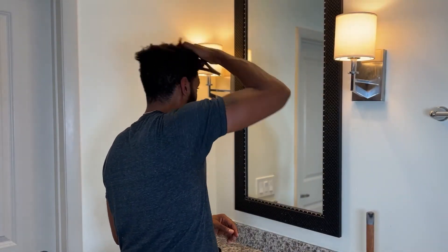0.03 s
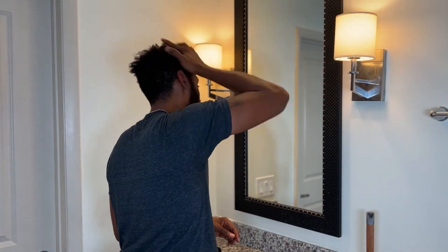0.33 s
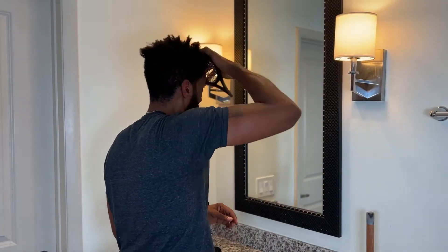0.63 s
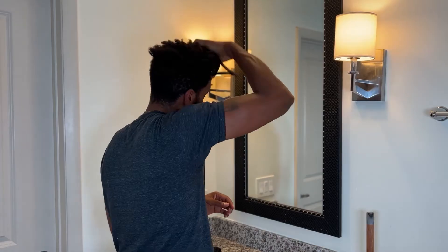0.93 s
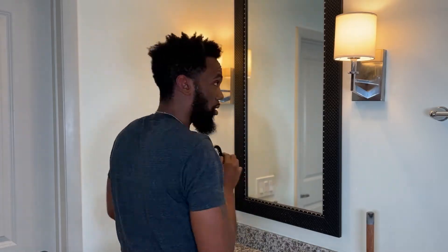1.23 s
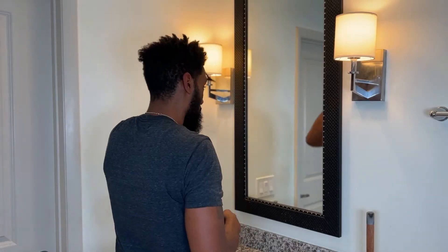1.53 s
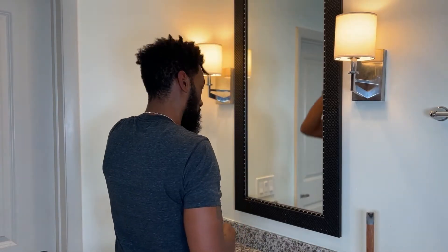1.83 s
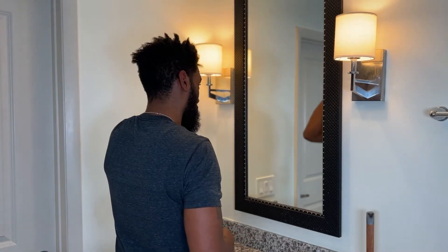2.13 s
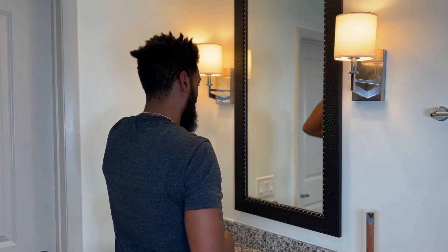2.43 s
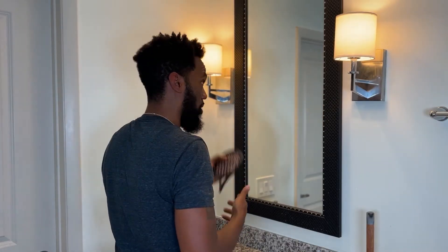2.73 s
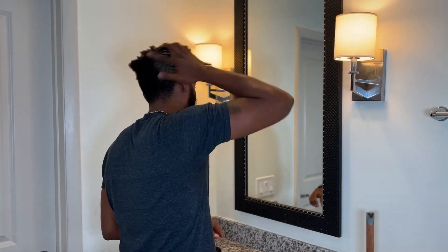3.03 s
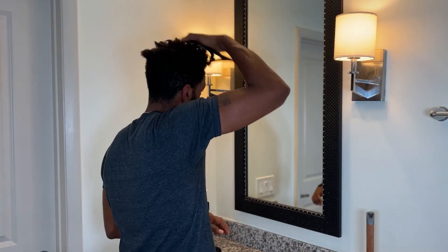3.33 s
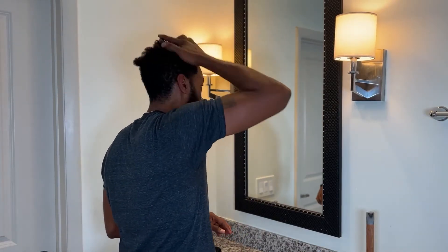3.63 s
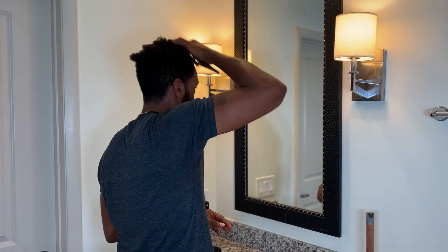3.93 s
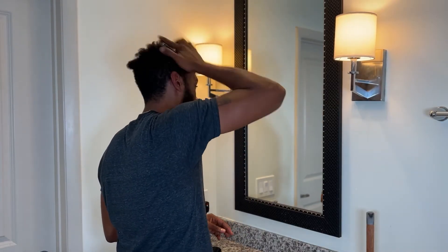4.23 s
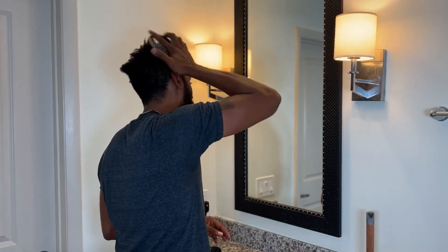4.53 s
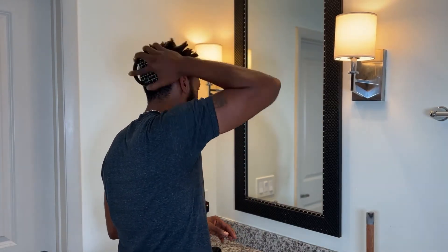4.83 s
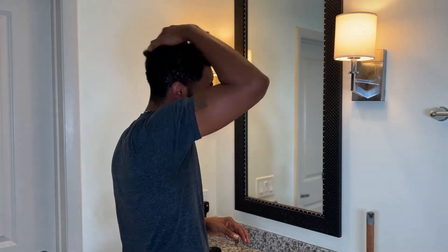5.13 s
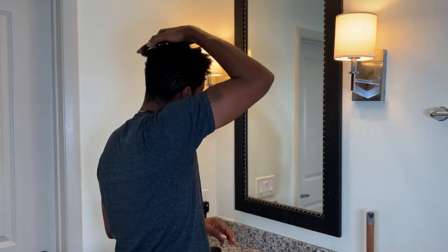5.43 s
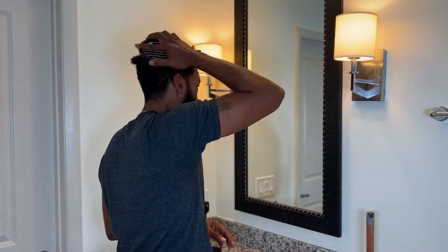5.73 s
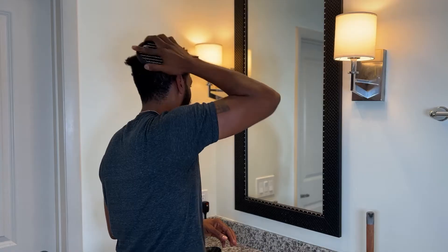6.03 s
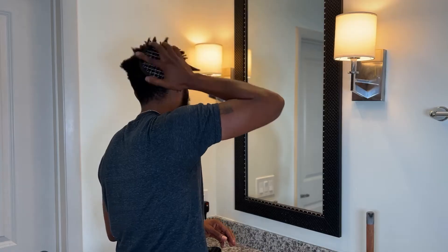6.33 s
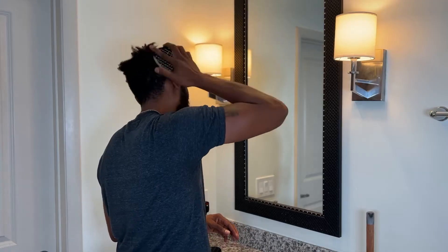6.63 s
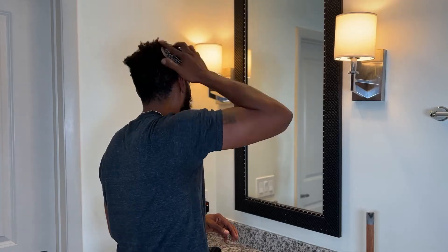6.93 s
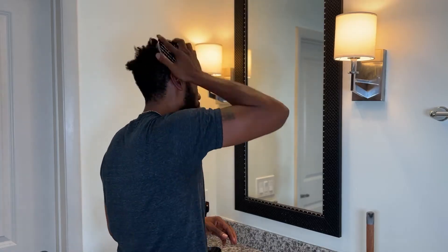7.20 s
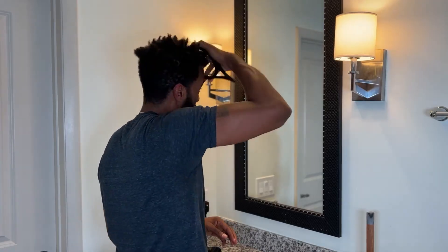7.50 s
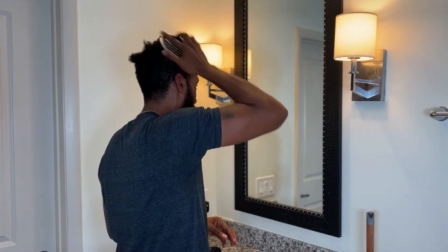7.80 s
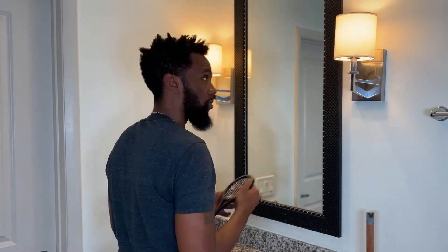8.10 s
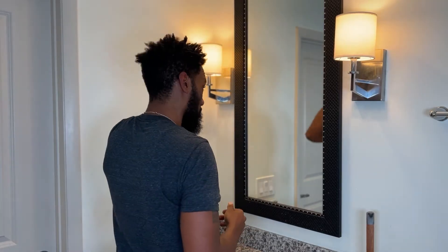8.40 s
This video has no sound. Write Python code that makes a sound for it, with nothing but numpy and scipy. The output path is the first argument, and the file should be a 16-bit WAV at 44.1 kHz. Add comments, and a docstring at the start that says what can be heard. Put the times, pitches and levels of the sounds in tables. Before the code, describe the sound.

A comb rubs quickly over short hair with a faint hiss, over low room rumble and one sharp knock.

```python
"""A quiet bathroom: a man rubs a comb over his short hair in small, very fast circles.
Hairs snap off the teeth in a hiss and the tips rasp on the scalp; both stop when the comb lifts.
While he works the back of his head his shirt scuffs in time. A close microphone picks up the low
rumble of his movements, light bumps, and one sharp knock and clack as the comb changes hands."""
import sys
import numpy as np
from scipy import signal
from scipy.fft import rfft, irfft
from scipy.io import wavfile

SR = 44100
rng = np.random.default_rng(int(sys.argv[2]) if len(sys.argv) > 2 else 0)


def store_wav(level_fs):
    """Save 16-bit WAV to argv[1]."""
    pcm = np.round(np.clip(np.atleast_2d(level_fs), -1, 1) * 32767)
    wavfile.write(sys.argv[1], SR, pcm.T.astype(np.int16))


N = 373086
TIME_S = np.arange(N) / SR

# Arm behind the head, dragging the shirt. Each row: start, end in seconds, gain in dB re body motion.
REACHES = [(1.355, 1.783, -23), (1.806, 2.45, -21.5), (2.45, 2.78, -21.5), (8.29, 8.35, -23.5)]
# Body motion, driving rumble and shirt. Each row: time in seconds, level in dB.
BODY_MOTION = [(0.1, -55), (0.35, -57), (0.75, -54), (1.2, -51.5), (1.37, -46.5), (1.48, -54.5),
               (1.63, -50), (1.9, -46), (2.2, -49), (2.76, -48), (2.87, -54), (3.16, -57), (3.3, -50.5),
               (3.75, -55.5), (4.9, -56), (7.0, -53.5), (8.14, -53), (8.3, -47.5)]


def gain_of(db):
    """Decibels to gain."""
    return 10 ** (np.asarray(db) / 20)


def unit_rms(x):
    """Scale to an rms of one."""
    return x / np.sqrt(np.mean(x ** 2) + 1e-20)


def curve(rows):
    """Linear interpolation of (seconds, value) rows."""
    return np.interp(TIME_S, *zip(*rows))


def gate(start_s, end_s, edge_s):
    """One between two times, zero outside, ramped edges."""
    return np.clip(.5 + np.minimum(TIME_S - start_s, end_s - TIME_S) / edge_s, 0, 1)


def add(mix, start_s, sound):
    """Mix a sound in, in place."""
    part = mix[max(round(start_s * SR), 0):][:len(sound)]
    part += sound[:len(part)]


def colour(x, spectrum, size=8192):
    """Minimum-phase filter, unit rms out. Each spectrum row: frequency in Hz, relative level in dB."""
    hz, db = np.transpose(spectrum)
    bins_hz = abs(np.fft.fftfreq(size, 1 / SR))
    log_gain = np.log(gain_of(np.interp(np.log(bins_hz + 1), np.log(hz), db)))
    response = np.exp(np.conj(signal.hilbert(log_gain)))
    taps = np.fft.ifft(response).real[:size // 2]
    return unit_rms(signal.oaconvolve(x, taps)[:N])


def resonate(x, hz, q):
    """One resonance, applied twice for steep skirts; unit rms out."""
    peak = signal.iirpeak(hz, q, fs=SR)
    return unit_rms(signal.lfilter(*peak, signal.lfilter(*peak, x)))


def wander(hz):
    """Smooth random drift of unit rms, rolling off above hz."""
    rolloff = np.exp(-(np.fft.rfftfreq(N, 1 / SR) / hz) ** 2)
    return unit_rms(irfft(rfft(rng.standard_normal(N)) * rolloff, N))


def grains(per_s, spread_db):
    """Random tiny snaps of either sign, a few larger than the rest."""
    size = gain_of(spread_db * np.minimum(rng.exponential(1, N), 4))
    return unit_rms(size * rng.choice([-1, 1], N) * (rng.random(N) < per_s / SR))


def stroke(strokes, depth_db, lag_strokes, bite):
    """One swell per stroke of the comb; bite skews it to a quick catch and slow release."""
    angle = 2 * np.pi * (strokes - lag_strokes)
    return unit_rms(gain_of(depth_db * (np.cos(angle) - bite * np.sin(2 * angle))))


def tick(hz, t60_s, rise_s=0.00056):
    """Short noise burst in one broad resonance."""
    t = np.arange(SR // 10) / SR
    band = resonate(rng.standard_normal(len(t)), hz, q=1.4)
    return band * gain_of(-60 * t / t60_s) * np.tanh(t / rise_s)


def room_hiss():
    """Faint steady hiss of the room."""
    # Each row: frequency in Hz, relative level in dB.
    air_spectrum = [(100, 9.5), (400, 16.5), (800, 8.5), (1500, 3), (3000, -4.5), (5000, -3), (8000, -14),
                    (13000, -6), (15200, -15)]
    return gain_of(-76.5) * colour(rng.standard_normal(N), air_spectrum)


def rumble(strokes):
    """Soft jolts of the moving body reach the microphone over the steady rumble of the room."""
    # Each row: frequency in Hz, relative level in dB.
    rumble_spectrum = [(15, -21.5), (31, -10), (45, 0), (65, 2), (100, 2.5), (160, -2.5), (200, -7),
                       (255, -10), (290, -13), (335, -24), (385, -32), (465, -24.5), (600, -49),
                       (1200, -77)]
    swell = stroke(strokes, depth_db=2.5, lag_strokes=0.094, bite=0.38)
    jolts = grains(per_s=400, spread_db=0.9) * swell
    body = colour(jolts, rumble_spectrum) * gain_of(curve(BODY_MOTION) + 2.1 * wander(hz=7.3))
    room = gain_of(-63.5) * colour(rng.standard_normal(N), rumble_spectrum)
    return body + room


def shirt(strokes):
    """Cloth catches and drags once per stroke, harder the more the body moves."""
    # Each row: frequency in Hz, relative level in dB.
    cloth_spectrum = [(150, -9), (350, 3.5), (470, 5), (620, 4.5), (850, 3), (1400, -0.5), (2100, -4.5),
                      (3200, -16), (7000, -38)]
    drag = sum(gain_of(db) * gate(start_s, end_s, edge_s=0.02) for start_s, end_s, db in REACHES)
    fibres = colour(grains(per_s=1600, spread_db=2.5), cloth_spectrum)
    swell = stroke(strokes, depth_db=8.5, lag_strokes=0.059, bite=0.51) * gain_of(1.4 * wander(hz=60))
    return gain_of(curve(BODY_MOTION)) * drag * fibres * swell


def flicks():
    """Comb or cloth catches and flicks free with a small tick."""
    # Each row: start in seconds, level in dB, centre in Hz.
    catches = [(.187, -65, 1200), (.32, -65, 1350), (.568, -62.5, 1250), (0.861, -63.5, 1200),
               (1.3392, -63, 5450), (2.133, -61, 1390), (2.498, -57.5, 1300), (2.648, -64, 1200),
               (3.083, -58.5, 2100), (3.375, -64, 5000), (3.601, -58.5, 5200), (6.859, -61, 5500),
               (8.232, -67, 1200)]
    out = np.zeros(N)
    for start_s, db, hz in catches:
        add(out, start_s, gain_of(db) * tick(hz, t60_s=0.031))
    return out


def microphone_knocks():
    """Each knock pushes the microphone out and back; its mount rings from first touch."""
    # Each row: time in seconds, level in dB, softness in seconds.
    hits = [(0.749, -42, 0.0013), (1.228, -39.5, 0.0016), (1.3011, -15, 0.0014), (1.3227, -34, 0.0023),
            (1.3733, -32.5, 0.0014), (2.135, -37, 0.0018), (2.2168, -35.5, 0.0014), (2.355, -40, 0.00143),
            (2.403, -36.5, 0.0013), (3.349, -40, 0.0013), (5.055, -43.5, 0.0013), (7.232, -42, 0.00137),
            (8.131, -40, 0.0011), (8.2417, -44, 0.0011)]
    # Each row: frequency in Hz, gain in dB, T60 in seconds.
    mount_modes = [(73.4, -19, 0.13), (137, -21, 0.075), (234, -54, 0.1), (462, -21.5, 0.04),
                   (840, -33.5, 0.044)]
    out = np.zeros(N)
    lead_samples = SR // 100
    t = np.arange(-lead_samples, SR // 4) / SR
    for time_s, db, soft_s in hits:
        push = -t / soft_s * np.exp((1 - (t / soft_s) ** 2) / 2)
        age_s = np.maximum(t + np.pi * soft_s, 0)
        ring = sum(gain_of(mode_db - 60 * age_s / t60_s) * np.sin(2 * np.pi * hz * age_s)
                   for hz, mode_db, t60_s in mount_modes)
        add(out, time_s - lead_samples / SR, gain_of(db) * (push + ring * np.tanh(age_s / soft_s)))
    return out


def comb_clacks():
    """The comb lands in the other hand and rattles once; its broad resonances ring briefly."""
    # Each row: start in seconds, level in dB.
    landings = [(1.2957, -56), (1.321, -68)]
    # Each row: frequency in Hz, gain in dB.
    comb_modes = [(1330, -0.5), (3050, -5), (6100, -3.5), (9600, -3)]
    out = np.zeros(N)
    for start_s, db in landings:
        clack = sum(gain_of(db + mode_db) * tick(hz, t60_s=0.042) for hz, mode_db in comb_modes)
        add(out, start_s, clack)
    return out


def comb_pressure(ease_db_per_s=1.54):
    """Hiss and rasp gains, zero between passes; the hiss sinks through a pass as the hair lies down."""
    # Each row: start and end in seconds, hair hiss gain in dB, scalp rasp gain in dB.
    passes = [(-0.02, 1.205, -71, -79), (1.218, 1.334, -79, -75), (1.361, 2.771, -70.5, -77.5),
              (2.778, 2.887, -84, -83), (2.886, 3.816, -71, -80.5), (3.849, 4.215, -72.5, -79),
              (4.227, 5.275, -72, -78.5), (5.284, 5.578, -74, -78), (5.581, 5.95, -73, -78.5),
              (5.951, 7.044, -71.5, -81.5), (7.079, 7.371, -72.8, -77), (7.399, 7.608, -74.5, -78),
              (7.636, 8.13, -72.5, -76.5), (8.135, 8.19, -83.5, -78), (8.236, 8.5, -72, -74)]
    hiss_gain, rasp_gain = np.zeros(N), np.zeros(N)
    for start_s, end_s, hiss_db, rasp_db in passes:
        touching = gate(start_s, end_s, edge_s=0.012)
        hiss_gain += touching * gain_of(hiss_db - ease_db_per_s * (TIME_S - start_s))
        rasp_gain += touching * gain_of(rasp_db)
    return hiss_gain, rasp_gain


def scalp_rasp(strokes):
    """Tooth tips rasp dully on the scalp; no two strokes press alike."""
    # Each row: frequency in Hz, relative level in dB.
    scalp_spectrum = [(200, -15.5), (370, 7), (465, 5), (600, 1.5), (800, -1.5), (1300, -6.5),
                      (2200, -10.5), (3200, -17.5), (6000, -23.5)]
    rasp = colour(grains(per_s=2500, spread_db=4.5), scalp_spectrum)
    swell = stroke(strokes, depth_db=2.5, lag_strokes=0.17, bite=0.22)
    return rasp * swell * gain_of(2.34 * wander(hz=38))


def hair_hiss(strokes):
    """Thousands of hairs a second snap off the teeth; some pluck a tooth, which rings briefly."""
    # Each row: frequency in Hz, relative level in dB.
    hair_spectrum = [(500, -26.5), (1200, -5), (2000, -3.5), (2900, -2.5), (3500, -4), (4300, -3),
                     (4900, -1), (6000, -1), (7800, -5), (9600, -4.5), (11000, -11.5), (13500, -15.5),
                     (15200, -29)]
    snaps = colour(grains(per_s=10000, spread_db=2.0), hair_spectrum)
    # Thick hairs sound lower than fine ones; each kind comes in its own tufts.
    thick = signal.filtfilt(*signal.butter(2, 6500, fs=SR), snaps)
    fine = snaps - thick
    tufts = thick * gain_of(wander(hz=70)) + fine * gain_of(wander(hz=76))
    teeth = gain_of(-10.5) * resonate(grains(per_s=900, spread_db=3.5), hz=4980, q=4.5)
    swell = stroke(strokes, depth_db=2.0, lag_strokes=0.015, bite=0.61)
    return (tufts + teeth) * swell * gain_of(0.82 * wander(hz=45))


def scene():
    """One arm motion drives hair, scalp, shirt and rumble; knocks, ticks and room hiss are added."""
    # Each row: time in seconds, strokes per second.
    stroke_rate = [(0.0, 17.88), (0.15, 23.75), (0.35, 20.9), (1.05, 24.6), (1.25, 20.63), (1.75, 24.37),
                   (2.15, 21.85), (2.8, 19.32), (3.1, 23.73), (3.9, 23.74), (4.05, 19.53), (4.15, 26.29),
                   (4.75, 21.42), (5.15, 23.9), (6.3, 22.72), (7.15, 23.6), (7.6, 26.63), (8.4, 20.94)]
    strokes = np.cumsum(curve(stroke_rate)) / SR
    # Behind the head the teeth bite later in the stroke.
    behind = sum(gate(start_s, end_s, edge_s=0.027) for start_s, end_s, _ in REACHES)
    comb_strokes = strokes - 0.38 * behind
    air = room_hiss()
    hiss_gain, rasp_gain = comb_pressure()
    combing = hiss_gain * hair_hiss(comb_strokes) + rasp_gain * scalp_rasp(comb_strokes)
    mix = combing + shirt(strokes) + rumble(strokes) + air
    return (mix + microphone_knocks() + comb_clacks() + flicks())[None]


def record(dry):
    """Steep linear-phase low-pass."""
    cutoff_hz = 15300
    low_pass = signal.firwin(511, cutoff_hz, window=("kaiser", 9), fs=SR)
    return signal.oaconvolve(dry, low_pass[None], "same")


dry = scene()
out = record(dry)
store_wav(out)
```